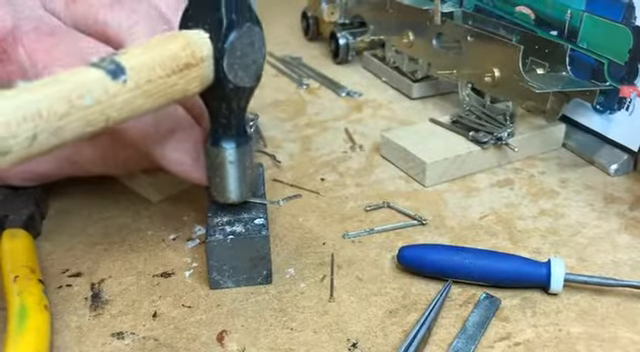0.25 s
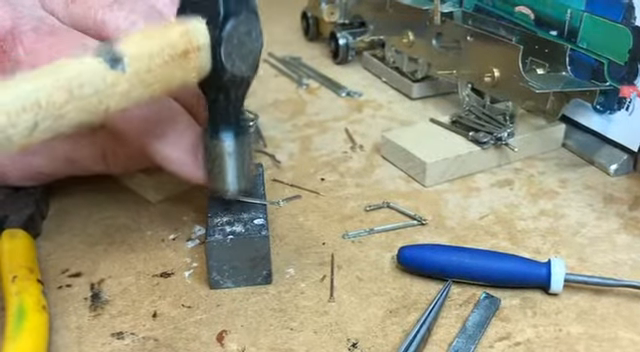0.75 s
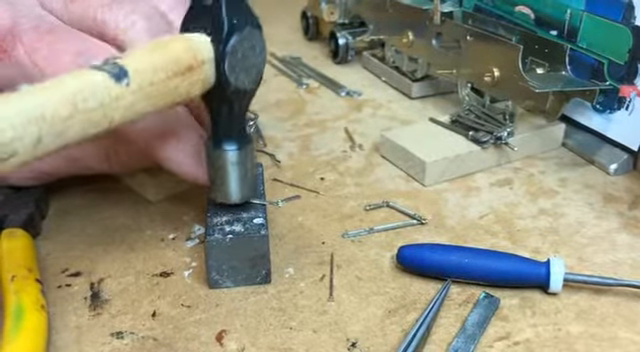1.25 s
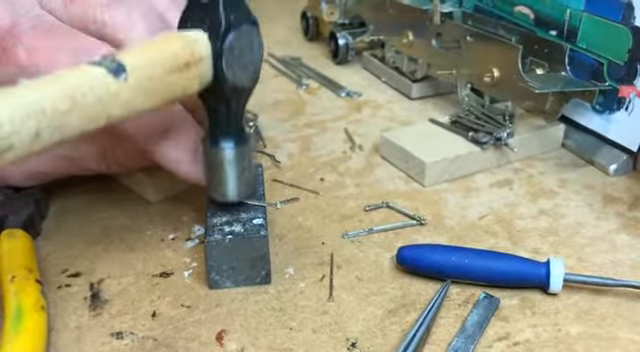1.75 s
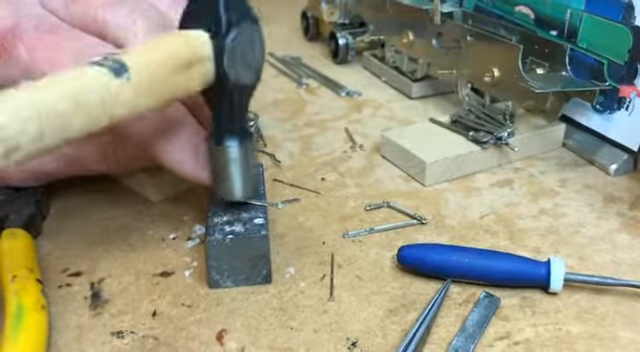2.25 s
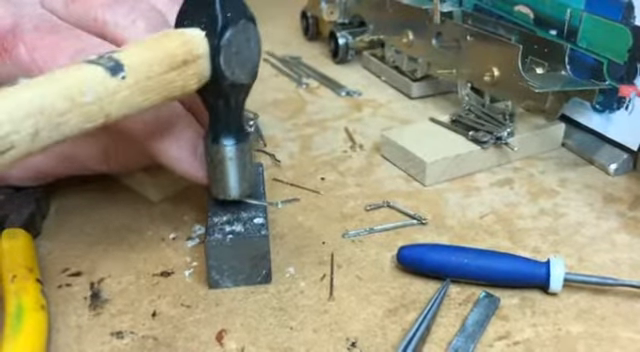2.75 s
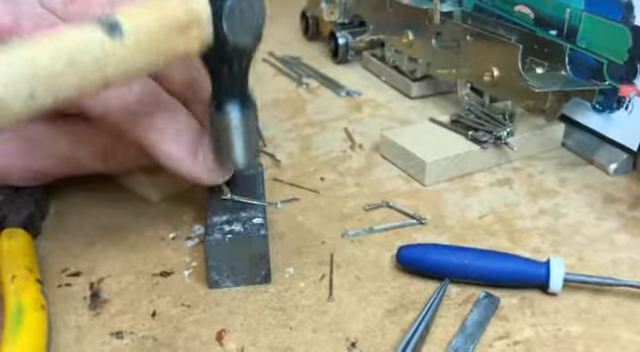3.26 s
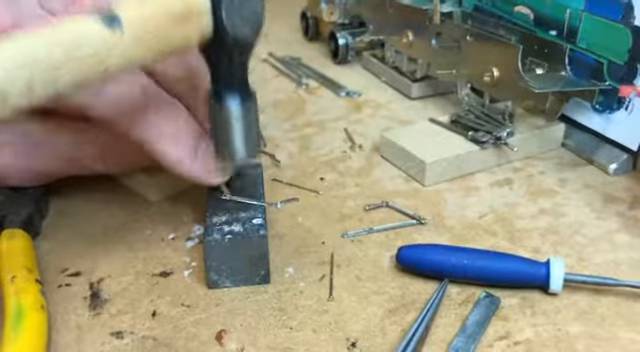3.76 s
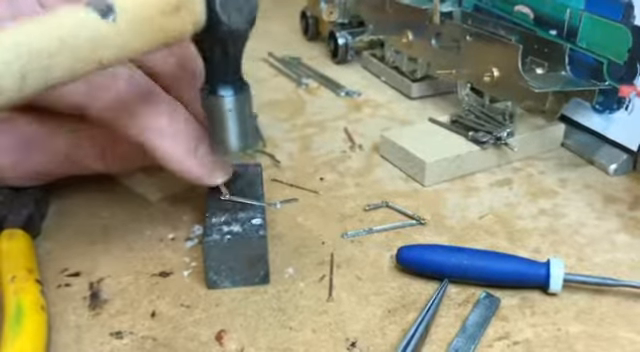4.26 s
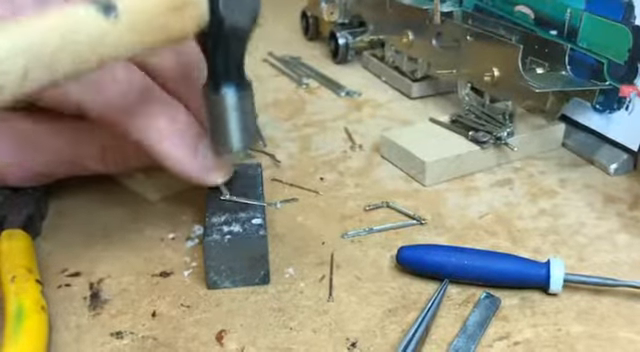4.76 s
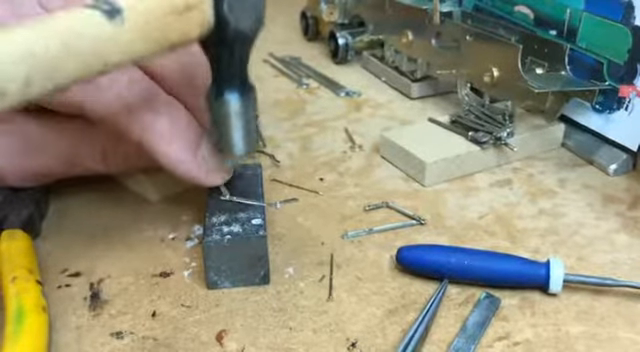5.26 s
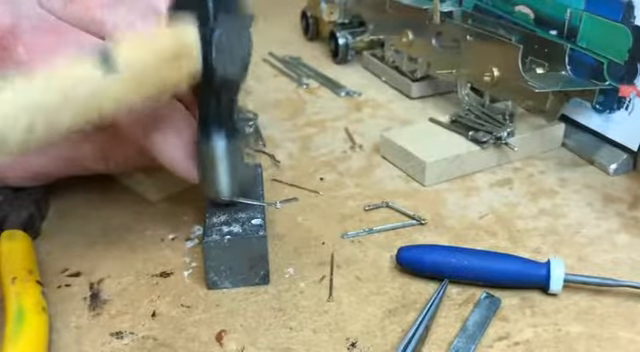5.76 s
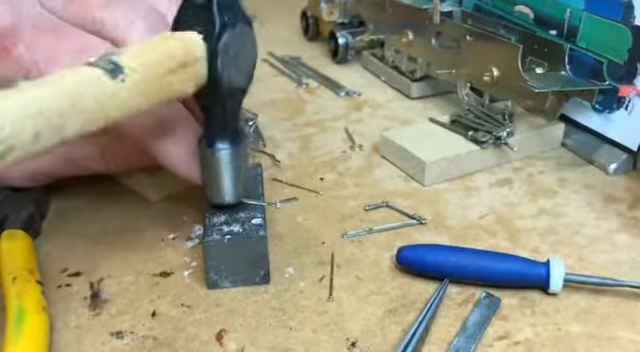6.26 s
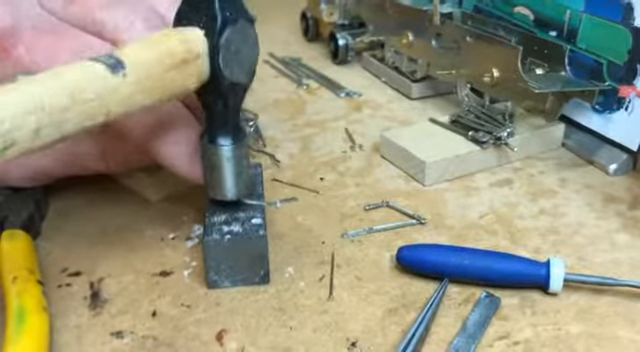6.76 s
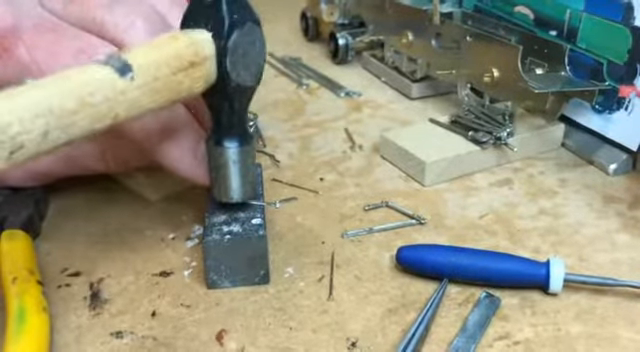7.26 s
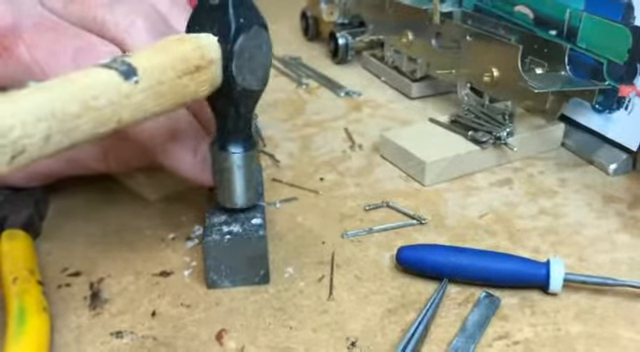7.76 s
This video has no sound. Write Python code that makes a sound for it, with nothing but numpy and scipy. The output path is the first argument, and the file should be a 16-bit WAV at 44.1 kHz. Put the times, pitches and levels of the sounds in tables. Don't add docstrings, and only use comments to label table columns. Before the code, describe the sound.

After half a second of quiet workshop hum and faint finger scuffing, a small hammer begins striking a rivet on a steel block, about four sharp knocks a second. The first taps are slightly softer; later blows are harder and brighter, shaking the wooden bench and making loose tools chatter. The run stops just before eight seconds with a tiny rustle. Close phone microphone, small room, light hiss.

```python
import sys
import numpy as np
from scipy import signal
from scipy.fft import rfft, irfft
from scipy.io import wavfile
from scipy.ndimage import uniform_filter1d, minimum_filter1d

SR = 44100
rng = np.random.default_rng(int(sys.argv[2]) if len(sys.argv) > 2 else 0)


def volts_from_decibels(level):
    exponent = np.asarray(level, float) / 20
    return 10 ** exponent


def output_pcm(signal):
    pcm = np.clip(np.atleast_2d(signal).T, -1, 1) * 32767
    wavfile.write(sys.argv[1], SR, np.round(pcm).astype(np.int16))


N = 352912

# [t/s, blow level/dB, short steel ring level/dB, long steel ring
# level/dB]
HAMMER_BLOWS = [(0.5004, -5.5, -70, -110), (0.7739, -4.5, -55.5, -74), (1.0136, -5.5, -58, -99),
                (1.2512, -5.5, -56.5, -72), (1.4836, -5, -48.5, -68), (1.7208, -5.5, -58, -76),
                (1.9664, -5.5, -54.5, -77.5), (2.2014, -5.5, -84, -88), (2.4496, -6, -56.5, -99),
                (2.7012, -5, -53, -75), (2.9276, -5, -67, -76),
                (3.1686, -3.5, -68, -69), (3.4085, -3.5, -47, -63.5), (3.6517, -4, -62, -69.5),
                 (3.8894, -3.5, -49.5, -71), (4.1353, -4.5, -57, -67.5), (4.3662, -3, -47, -74),
                 (4.5949, -3, -50, -63.5), (4.8458, -3.5, -50, -63), (5.084, -3.5, -56, -61.5),
                 (5.3318, -3.5, -54, -63), (5.5692, -3, -55, -68), (5.797, -5.5, -58, -63),
                 (6.0286, -3, -68, -67), (6.2594, -2.5, -52, -88), (6.4906, -4, -57, -69.5),
                 (6.717, -3, -51.5, -62.5), (6.9461, -3, -63, -67), (7.184, -4, -53, -77),
                 (7.4216, -3.5, -50, -80), (7.646, -3, -59, -68)]
BLOWS = HAMMER_BLOWS
START_S = BLOWS[0][0]

# [f/Hz, level/dB, T60/s, sign of first swing]
BLOCK_MODES = [(799, 6.7, .003, 1), (1600, 6.7, .005, 1), (2029, 5.5, .006, -1), (2871, .9, .018, 1),
               (3857, 19.8, .003, -1)]
# [delay/ms, level/dB, sign]
NEAR_ECHOES = [(4.165, -15, 1), (5.78, -17.5, 1), (7.14, -21, -1), (12.58, -19, 1), (16.9, -21, -1),
               (21.8, -22, -1), (24.0, -23, 1)]
# [f/Hz, level/dB, T60/s, signed first swing]
BENCH_MODES = [(175.7, -13.5, 0.035, 0.98), (373.4, -10, 0.054, -1), (592, -4, 0.028, -0.99),
               (1201, -4, 0.026, 0.92), (1406, -4.5, 0.024, 1), (1688, -7, 0.018, 0.97),
               (1846, -13.5, 0.055, 0.85), (2410, -15, .02, -0.62), (3044, -5.5, 0.067, -0.97)]
# [f/Hz, level/dB]
FRAME_PANEL_MODES = [(135, -31), (232, -26), (270, -22), (374, -25), (480, -27), (545, -26), (600, -21.5),
                     (700, -26.5), (780, -40), (865, -36), (1035, -28), (1222, -25.5), (1449, -27), (1570, -58.5),
                     (1713, -29.5), (1845, -29), (1918, -32), (2040, -41), (2310, -45), (2480, -22), (2650, -22),
               (3330, -21), (3760, -13), (4030, -5), (4600, 3), (5880, 19.5)]
# [f/Hz, T60/s]
FRAME_T60 = [(130, 0.22), (300, 0.15), (600, .11), (1400, 0.19), (1900, 0.24), (2500, .13), (4000, .06),
             (6000, .035)]
# [f/Hz, level/dB]
ROOM_SPECTRUM = [(60, -19), (260, 9), (800, 8.5), (1500, 14), (2200, 16), (3000, 13), (4200, 19),
                 (6500, 3.5)]
# [f/Hz, T60/s]
ROOM_T60 = [(100, 0.64), (300, 0.24), (700, 0.28), (1200, 0.35), (1750, 0.47), (2400, 0.31), (3300, 0.41),
            (5000, 0.39)]
# [f/Hz, level/dB, T60/s]
CRACK_MODES = [(4073, 14, 0.026), (4518, 22, 0.021), (5853, 18, 0.02), (7100, 5, 0.0033)]
# [f/Hz, level/dB]
RATTLE_SPECTRUM = [(2500, -20), (4000, 1), (6200, 2), (7500, -5.5), (9400, -1), (10300, -13.5), (14000, -8),
                   (16000, -21)]
# [f/Hz, level/dB]
SETTLE_SPECTRUM = [(2000, -10), (3500, -5.5), (4600, -2), (6500, -8.5), (10000, -15.5), (16000, -25.5)]
# [f/Hz, T60/s]
HAMMER_MODES = [(11203, .075), (12548, .9)]
# [t/s, level/dB, f/Hz]
TICKS = [
    (7.888, -49, 6200),
]
# [f/Hz, level/dB per Hz]
HUM_SPECTRUM = [(15, -13), (60, -13.5), (85, -9.5), (102, -3.5), (122, -12), (370, -17.5), (900, -28),
                (4000, -45)]
# [f/Hz, level/dB per Hz]
DRONE_SPECTRUM = [(60, -29.5), (130, -2), (260, -2), (500, -7), (1000, -10), (1700, -6.5), (3000, -35)]
# [f/Hz, level/dB]
SCUFF_SPECTRUM = [(1100, -23), (1450, 0), (1800, 0), (2100, -25)]
# [f/Hz, level/dB per Hz]
HISS_SPECTRUM = [(500, -20), (1000, 2), (2000, 3), (3300, 0), (6500, -5), (10500, -8), (14500, -10),
                 (16000, -14)]

HARD_MS, SEATING_MS, SEATING_S, FLATTENING_MS, FLATTENING_S = 0.086, 0.12, 0.25, 0.045, 2.52
SHAKE_DB, SOFT_SHAKE_DB, SHAKE_S = -17.5, -12, 1.32
OPEN_AT_S, OPEN_S, CREEP_S = 0.75, 0.069, 1.1
HUM_DB, HUM_OPEN_DB = -63.5, 1
DRONE_DB, DRONE_EARLY_DB, CALM_AT_S = -62, -6, 7.85
HISS_DB, HISS_OPEN_DB, HISS_CREEP_DB = -78, 9.5, 2.5
SCUFF_S, SCUFF_LONG_S, SCUFF_DB = 0.18, 0.14, -72
RUSTLE_S, RUSTLE_LONG_S, RUSTLE_DB = 7.89, 0.032, -68


def blows(thump_hz=85, thump_db=10, thump_t60=0.021, trim_db=7, edge_db=-33):
    lead = 28
    t = np.arange(SR // 2) / SR
    ms = (np.arange(64) - lead) * 1000 / SR
    out, body = np.zeros(N), response(t)
    trim = volts_from_decibels(-trim_db * (t / .2) ** 3)
    edge = bell(ms, HARD_MS)
    for s, db, *_ in BLOWS:
        seating = SEATING_MS * fading(s, SEATING_S)
        flattening = FLATTENING_MS * fading(s, FLATTENING_S)
        force = bell(ms, HARD_MS + seating + flattening) + volts_from_decibels(edge_db) * edge
        stray = volts_from_decibels(-26.5) * tail(t)
        add(out, s - lead / SR, signal.oaconvolve(volts_from_decibels(db + 5) * force, trim * (body + stray)))
        thump = ring([(thump_hz, shake(s, db) + thump_db, thump_t60)], t)
        add(out, s, thump)
    return out


def bell(ms, width_ms):
    pulse = np.exp(-.5 * (ms / width_ms) ** 2)
    return pulse / pulse.sum()


def response(t, tail_db=-10, build_ms=6):
    taps = np.zeros(len(t))
    for ms, db, sign in [(0, 0, 1)] + NEAR_ECHOES:
        taps[round((ms + .13) * SR / 1000)] = sign * volts_from_decibels(db)
    knock = signal.fftconvolve(taps, ring(BLOCK_MODES, t))[:len(t)]
    frame_modes = [(hz, db, read(FRAME_T60, hz)) for hz, db in FRAME_PANEL_MODES]
    frame = gathering(t, build_ms) * ring(frame_modes, t)
    return knock + ring(BENCH_MODES, t) + frame + volts_from_decibels(tail_db) * tail(t)


def tail(t, build_ms=5, near_share=0.63, near_s=0.045):
    noise = coloured(rng.standard_normal(len(t)), ROOM_SPECTRUM)
    hz, frame_s, z = signal.stft(noise, SR, nperseg=256)
    decay = volts_from_decibels(-60 * frame_s / read(ROOM_T60, hz)[:, None])
    noise = signal.istft(z * decay, SR, nperseg=256)[1][:len(t)]
    thinning = 1 - near_share + near_share * np.exp(-t / near_s)
    return gathering(t, build_ms) * thinning * noise


def rattle(rise_ms=6.26, fast_t60=0.055, slow_t60=0.19, slow_db=-13, light_db=5, heavy_db=7, lumps_db=1.0):
    t = np.arange(SR // 4) / SR
    fast, slow, cracks = np.zeros((3, N))
    rise = 1 - np.exp(-1000 * t / rise_ms)
    spots = rng.standard_normal((len(BLOWS), len(CRACK_MODES)))
    for (s, blow_db, *_), spot in zip(BLOWS, spots):
        shake_db = shake(s, blow_db)
        heavy = heavy_db * fading(s, SEATING_S)
        light = light_db * fading(s, SHAKE_S)
        add(fast, s, rise * volts_from_decibels(shake_db + 1.0 + light - 60 * t / fast_t60))
        add(slow, s, rise * volts_from_decibels(shake_db + slow_db - heavy - 60 * t / slow_t60))
        crack_db = shake_db - 20 - heavy
        modes = [(hz, crack_db + db + 3 * k, t60) for (hz, db, t60), k in zip(CRACK_MODES, spot)]
        add(cracks, s, ring(modes, t))
    lumps = volts_from_decibels(lumps_db * evened(uniform_filter1d(rng.standard_normal(N), 60)))
    light_noise, heavy_noise = lumps * rng.standard_normal((2, N))
    chatter = fast * coloured(light_noise, RATTLE_SPECTRUM)
    return cracks + chatter + slow * coloured(heavy_noise, SETTLE_SPECTRUM)


def hammer_head():
    out, t = np.zeros(N), np.arange(N) / SR
    ends = [row[0] for row in BLOWS[1:]] + [N / SR]
    for (s, *_, short_db, long_db), end in zip(BLOWS, ends):
        modes = [(hz, db + 15.5, t60) for (hz, t60), db in zip(HAMMER_MODES, (short_db, long_db))]
        add(out, s, ring(modes, t[:round((end - s) * SR)]))
    return out


def ticks():
    out, t = np.zeros(N), np.arange(2000) / SR
    for s, db, hz in TICKS:
        modes = [(hz, db - 2, .02), (hz * 1.29, db - 7, .015), (hz * .53, db - 6, .03), (hz * .4, db - 5, .03)]
        add(out, s, ring(modes, t))
    return out


def background():
    t = np.arange(N) / SR
    opened = .5 + .5 * np.tanh((t - OPEN_AT_S) / OPEN_S)
    early = fading(t, CREEP_S)
    shaken = opened * (.5 - .5 * np.tanh((t - CALM_AT_S) / OPEN_S))
    layers = [
        (volts_from_decibels(HUM_DB + HUM_OPEN_DB * opened), HUM_SPECTRUM),
        (shaken * volts_from_decibels(DRONE_DB + DRONE_EARLY_DB * early), DRONE_SPECTRUM),
        (volts_from_decibels(SCUFF_DB) * np.exp(-((t - SCUFF_S) / SCUFF_LONG_S) ** 2), SCUFF_SPECTRUM),
        (volts_from_decibels(RUSTLE_DB) * np.exp(-((t - RUSTLE_S) / RUSTLE_LONG_S) ** 2), SETTLE_SPECTRUM),
        (volts_from_decibels(HISS_DB + HISS_OPEN_DB * opened + HISS_CREEP_DB * (2 - early)), HISS_SPECTRUM)]
    return sum(level * coloured(rng.standard_normal(N), spectrum) for level, spectrum in layers)


def ring(modes, t):
    out = np.zeros(len(t))
    for hz, db, t60, *sign in modes:
        out += np.prod(sign) * volts_from_decibels(db - 60 * t / t60) * np.sin(2 * np.pi * hz * t)
    return out


def gathering(t, build_ms):
    return 1 - np.exp(-(1000 * t / build_ms) ** 2)


def fading(s, span_s):
    return np.exp(-np.maximum(s - START_S, 0) / span_s)


def shake(s, db):
    return db + SHAKE_DB + SOFT_SHAKE_DB * fading(s, SHAKE_S)


def evened(x):
    return x / np.sqrt(np.mean(x ** 2) + 1e-20)


def read(points, hz):
    f, value = np.transpose(points)
    return np.interp(np.log(hz + 1), np.log(f + 1), value)


def coloured(x, spectrum):
    gain = volts_from_decibels(read(spectrum, np.fft.rfftfreq(len(x), 1 / SR)))
    return evened(irfft(rfft(x) * gain, len(x)))


def add(mix, s, sound):
    part = mix[round(s * SR):][:len(sound)]
    part += sound[:len(part)]


def scene(bass_hz=95):
    high_pass = signal.butter(2, bass_hz, "high", fs=SR, output="sos")
    knocks = signal.sosfilt(high_pass, blows())
    return (knocks + rattle() + hammer_head() + ticks() + background())[None]


def pre_echo(x, near_db=-2, whistle_hz=3062, whistle_db=24, whistle_t60=0.043):
    leak_db, early_leak_db, leak_s = -40, -6, 2.0
    quiet = uniform_filter1d(abs(x), 256, origin=127) < .04
    front = x * np.roll(uniform_filter1d(1. * quiet, 40), 60)
    mids = signal.sosfilt(signal.butter(2, (300, 7000), "band", fs=SR, output="sos"), front)
    ghosts = np.roll(mids, -1024) + volts_from_decibels(near_db) * np.roll(mids, -512)
    r = volts_from_decibels(-60 / whistle_t60 / SR)
    poles = [1, -2 * r * np.cos(2 * np.pi * whistle_hz / SR), r * r]
    whistle = signal.lfilter([1 - r], poles, front[::-1])[::-1]
    wobble_db = 4 * evened(uniform_filter1d(rng.standard_normal(N), 600))
    leak = volts_from_decibels(leak_db + early_leak_db * fading(np.arange(N) / SR, leak_s))
    return leak * (volts_from_decibels(wobble_db) * ghosts + volts_from_decibels(whistle_db) * whistle)


def limited(x, release_db_s=1200):
    fall = np.arange(N) * release_db_s / SR
    peak_db = -minimum_filter1d(-20 * np.log10(abs(x) + 1e-9), 9)
    held_db = np.maximum.accumulate(peak_db + fall) - fall
    over_db = np.maximum(held_db + .2, 0)
    return x / volts_from_decibels(uniform_filter1d(over_db, 9))


def top_cut(x):
    return signal.sosfilt(signal.butter(12, 16630, fs=SR, output="sos"), x)


def record(dry):
    x = dry[0]
    x = limited(x + pre_echo(x))
    low_pass = signal.firwin(255, 15800, window=("kaiser", 8), fs=SR)
    x = signal.oaconvolve(x, low_pass, "same")
    return top_cut(x[None])


dry = scene()
out = record(dry)
output_pcm(out)
```